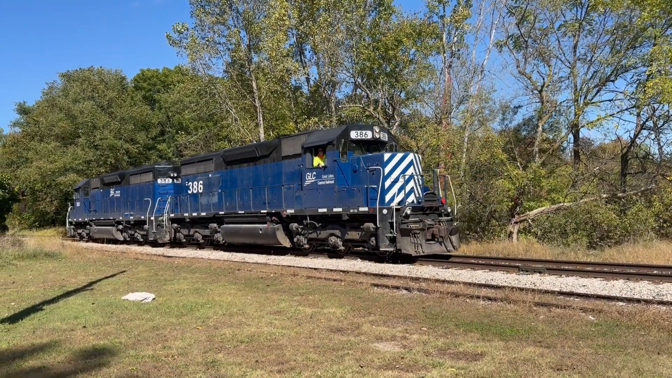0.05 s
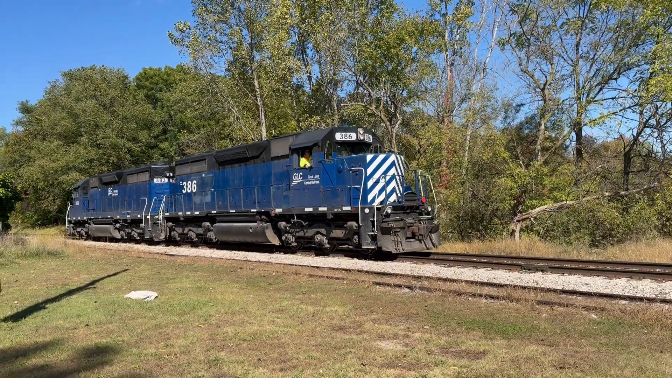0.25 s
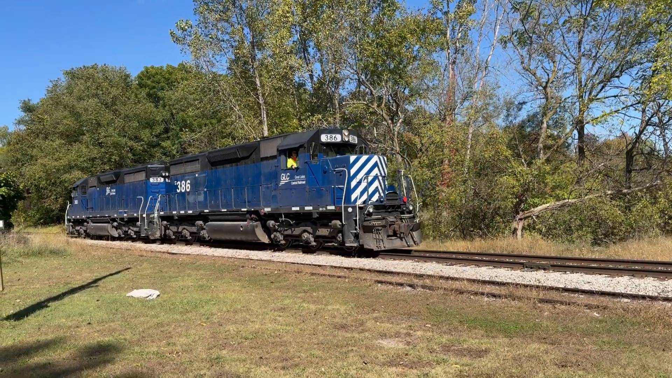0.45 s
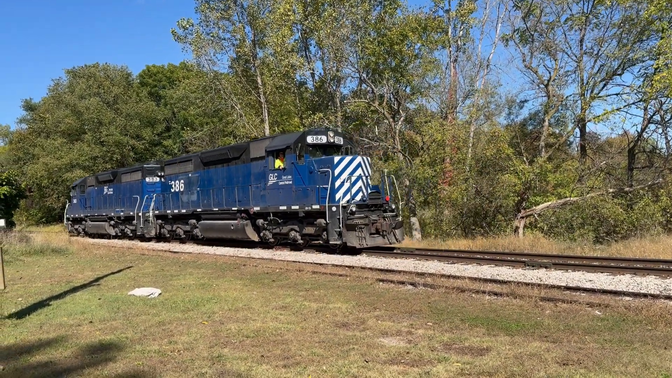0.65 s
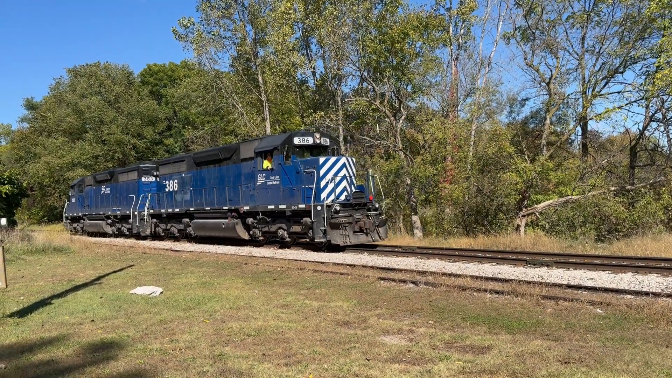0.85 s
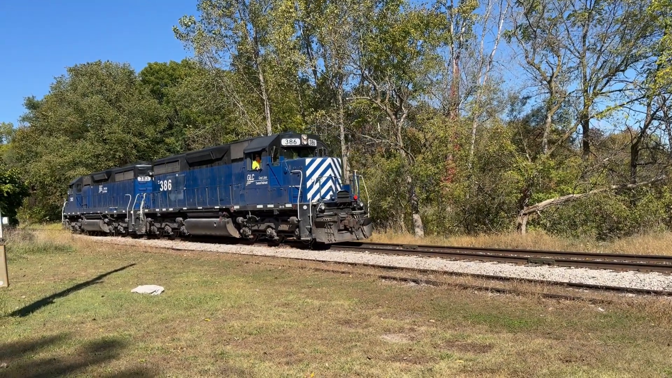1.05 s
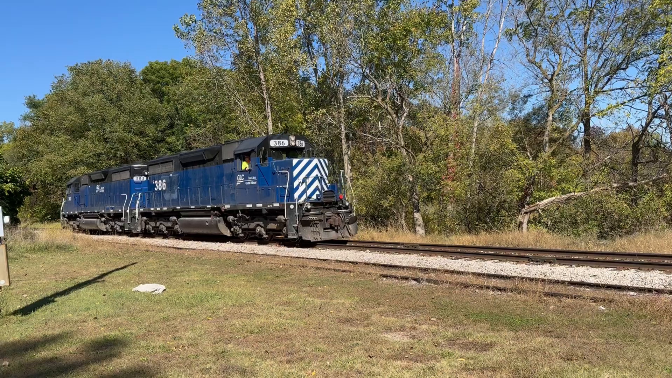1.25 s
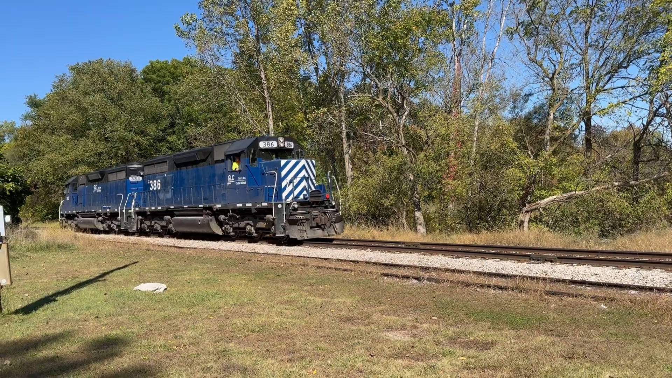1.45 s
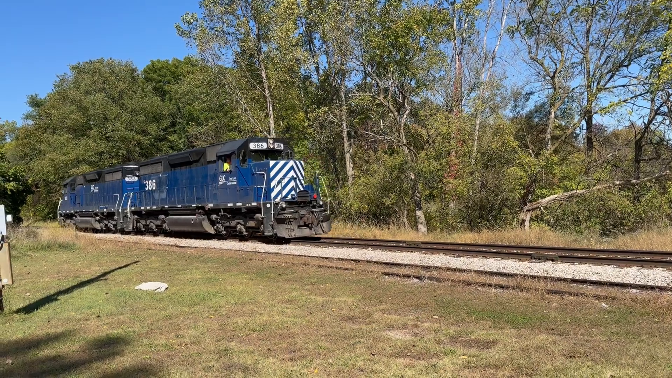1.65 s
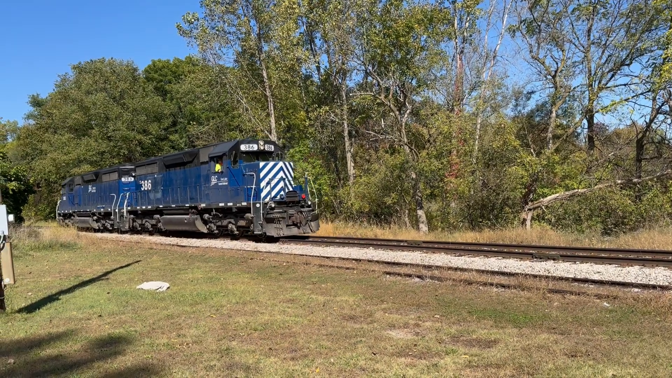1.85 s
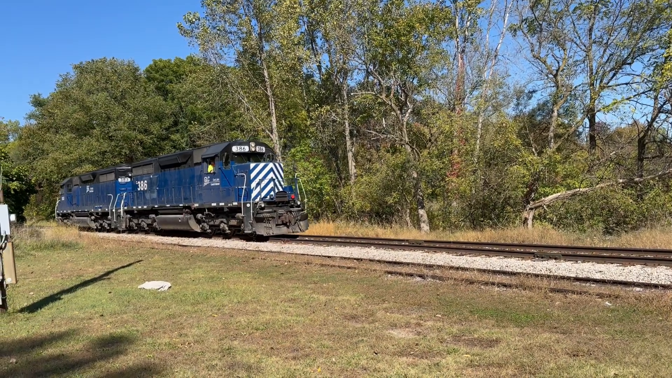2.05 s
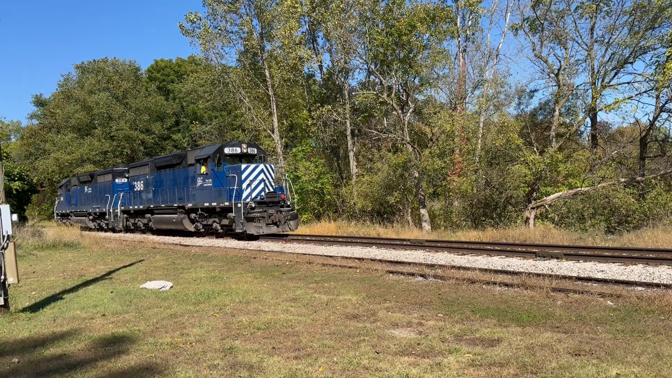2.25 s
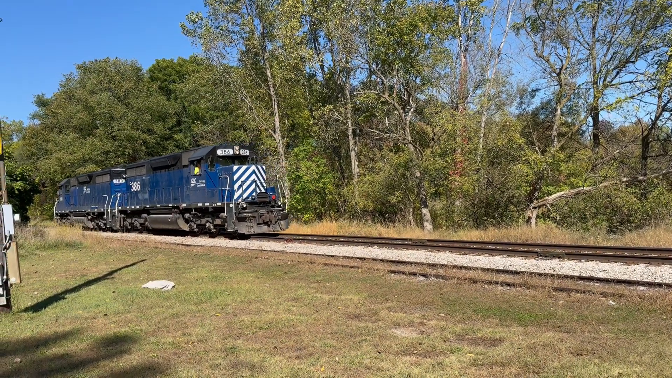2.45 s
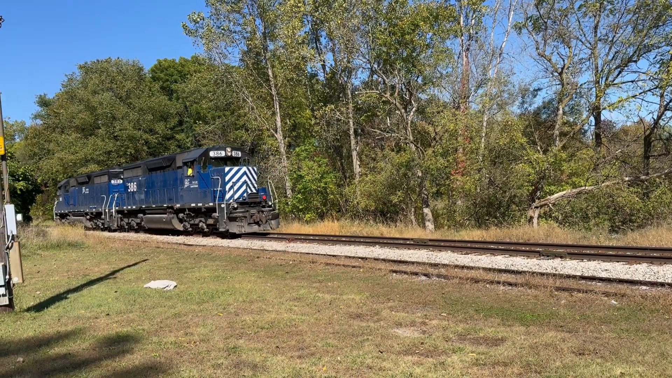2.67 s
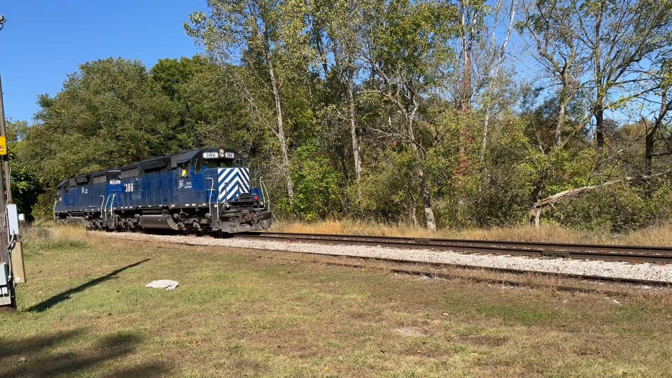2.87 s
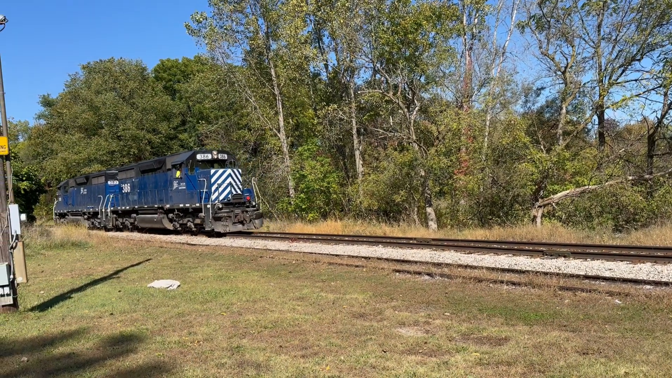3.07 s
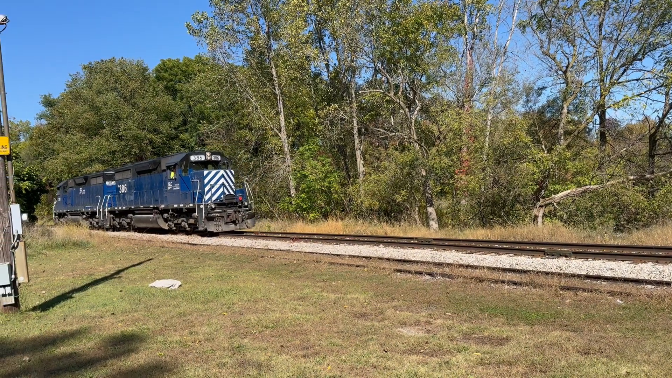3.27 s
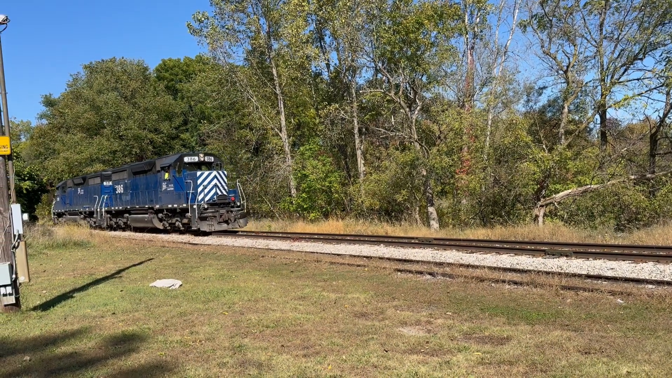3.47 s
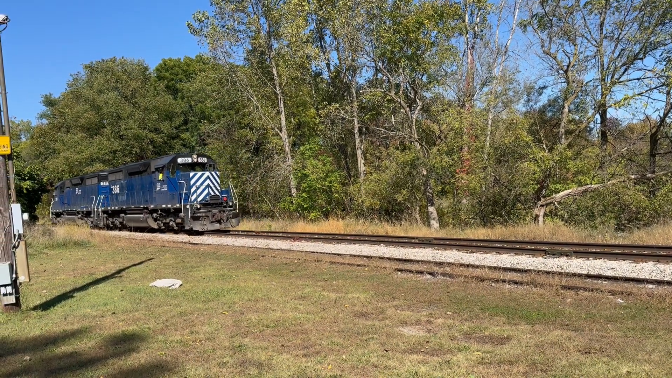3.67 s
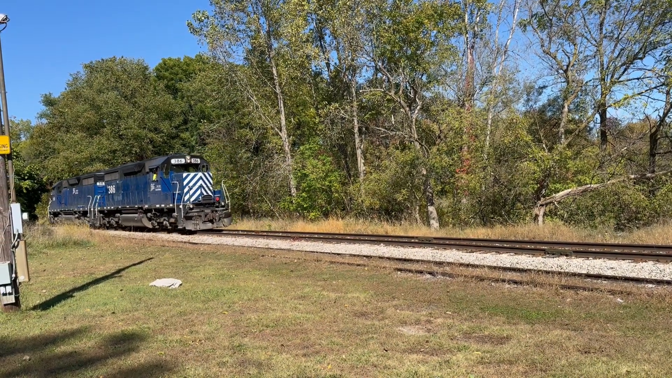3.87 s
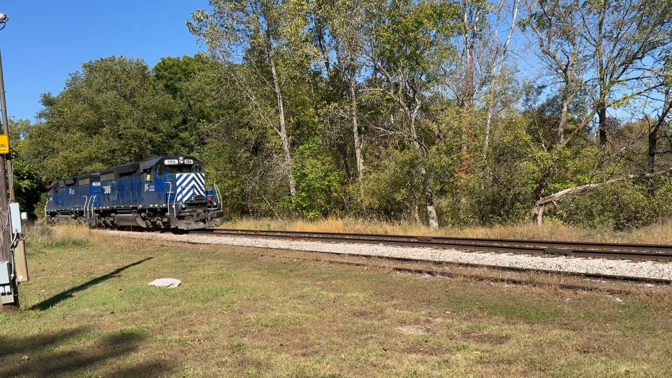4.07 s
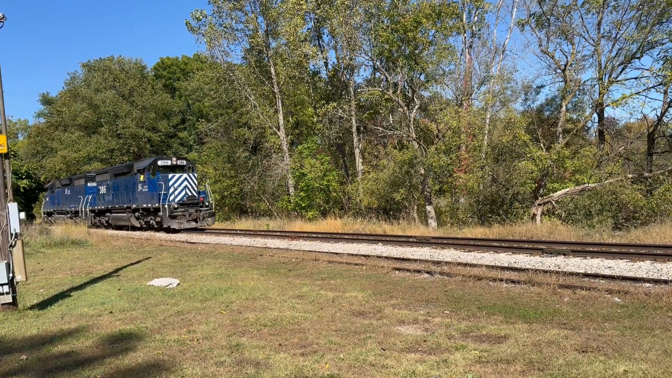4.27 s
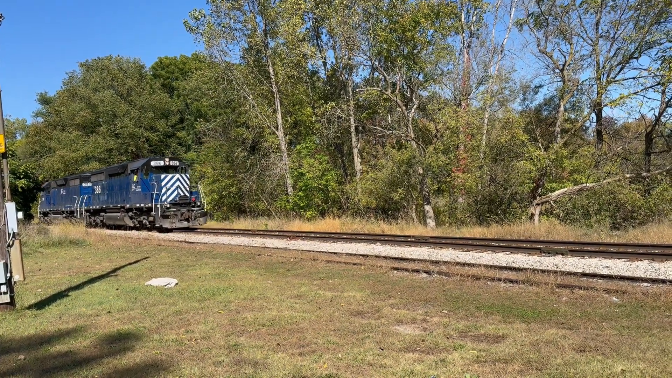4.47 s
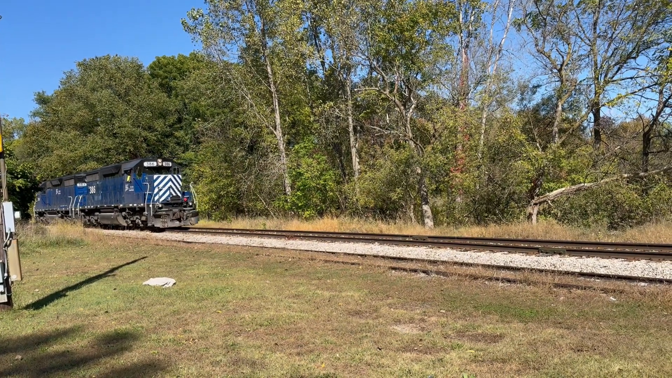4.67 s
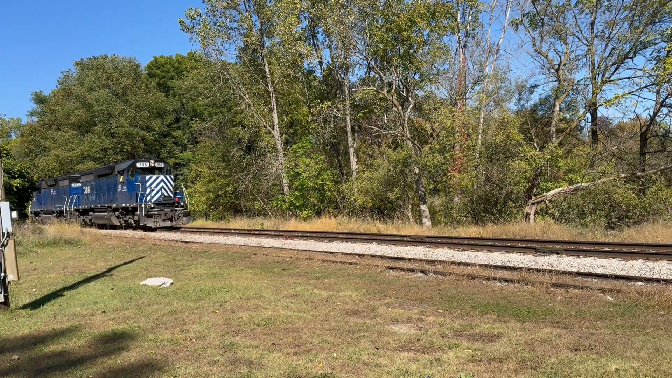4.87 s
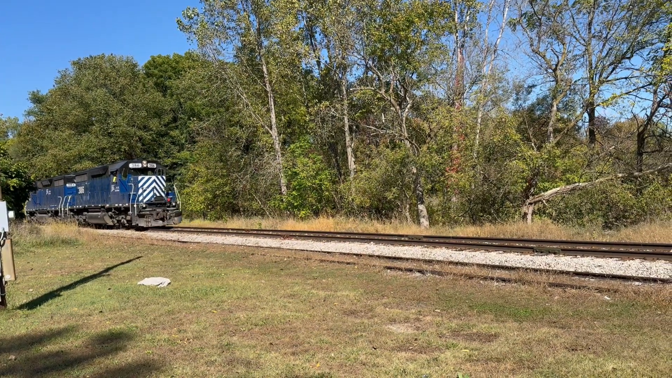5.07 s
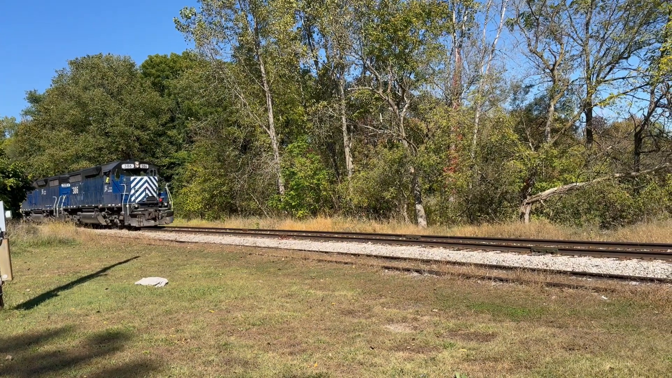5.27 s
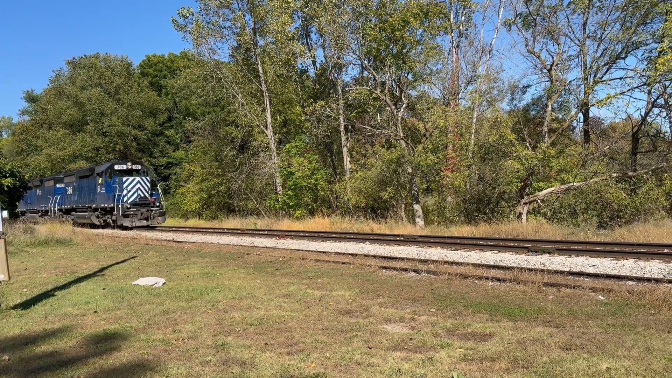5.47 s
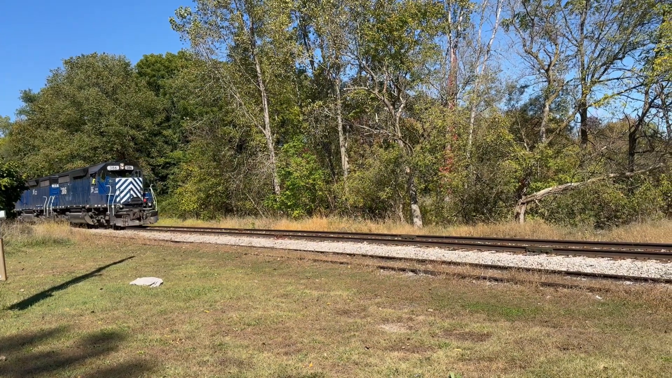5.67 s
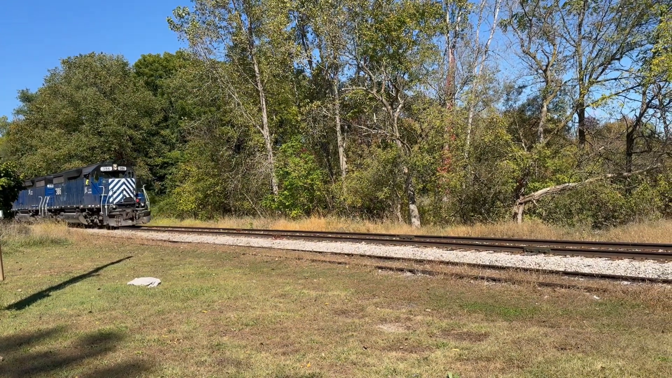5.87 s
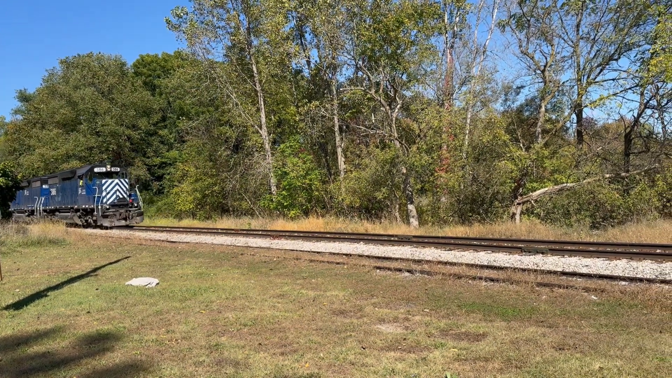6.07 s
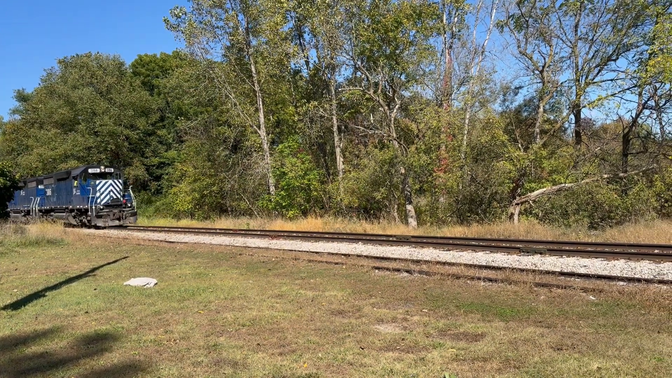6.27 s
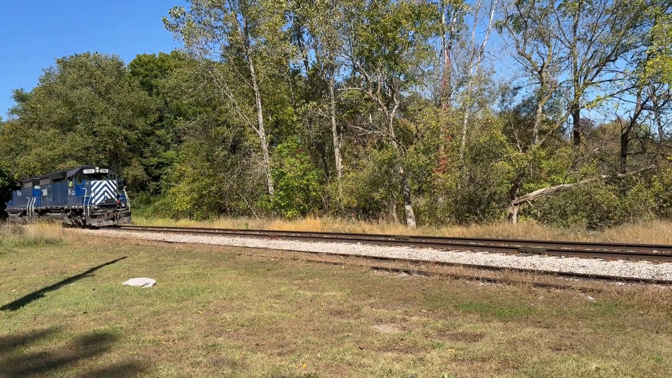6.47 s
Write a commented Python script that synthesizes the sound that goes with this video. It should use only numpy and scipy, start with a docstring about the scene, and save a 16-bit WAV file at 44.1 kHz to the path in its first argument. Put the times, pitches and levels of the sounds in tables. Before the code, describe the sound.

Outdoors beside a railway, two coupled diesel locomotives start loud and close, moving away leftward. From 0 to about 4 seconds the deep, pulsing exhaust drone glides down in pitch as the engines throttle back, the pair beating unevenly; a fuzzy turbo whine falls with it over broad low roar and soft hiss. A thin wheel squeal sounds during the first 0.75 seconds. Dull rail-joint thuds land near 1.05, 1.55 and 2.85, with scrapes and squeaks around 1.1 to 2.5. A sharp short scrape comes at 3.2, and the roar swells slightly around 3.7 to 4.2 with a faint squeal. From 4 seconds the engines idle steadily, quieter and more distant. A brief metallic chirp sounds at 4.75, a weak thud at 5.8, and scraping, squeaks and quick bright ticks near 6.2. The rumble continues to the cut at 6.5.

```python
"""Two coupled diesel locomotives roll away down a track while their engines throttle back to idle.
Their exhausts are sums of whole shaft orders that beat as one crankshaft gains on the other.
Turbocharger whine, roar and flange scrapes are noise shaped in short-time spectra; gear tones and
wheel squeals are wavering sines, joint thuds are damped tones with noise, and a loose part ticks."""
import sys
import numpy as np
from scipy import signal
from scipy.fft import rfft, irfft
from scipy.io import wavfile
from scipy.ndimage import uniform_filter1d

SR = 44100
rng = np.random.default_rng(int(sys.argv[2]) if len(sys.argv) > 2 else 0)


def output_pcm(signal):
    """Save a mono or channel-first signal as 16-bit PCM at the path in sys.argv[1].

    Samples are clipped to [-1, 1] before scaling.
    """
    pcm = np.clip(np.atleast_2d(signal).T, -1, 1) * 32767
    wavfile.write(sys.argv[1], SR, np.round(pcm).astype(np.int16))


def amplitude_ratio(level_db):
    """Convert a level in decibels to the matching linear amplitude (field) ratio."""
    exponent = np.asarray(level_db, float) / 20
    return 10 ** exponent


N = 287532  # samples
FRAME, HOP = 2048, 256  # samples, short-time spectra


def column(rows, t):
    """Linear interpolation: reads every column of a curve at the times t."""
    s, *values = np.transpose(rows)
    return [np.interp(t, s, v) for v in values]


def read(points, hz):
    """Interpolation on a log-frequency axis, as pitch is heard."""
    f, value = np.transpose(points)
    return np.interp(np.log(hz + 1), np.log(f + 1), value)


def evened(x):
    """Normalization of power: scales to rms 1."""
    return x / np.sqrt(np.mean(abs(x) ** 2) + 1e-20)


def wander(shape, size):
    """Low-passed randomness: noise averaged over size steps, at rms 1."""
    return evened(uniform_filter1d(rng.standard_normal(shape), size=size, axis=-1))


def grain(bins, frames, shape):
    """Correlated randomness: noise averaged over bins and frames, at rms 1."""
    across = uniform_filter1d(rng.standard_normal(shape), size=bins, axis=0)
    return evened(uniform_filter1d(across, size=frames, axis=1))


def add(mix, s, sound):
    """Superposition: mixes a sound in at s seconds."""
    part = mix[round(s * SR):][:len(sound)]
    part += sound[:len(part)]


# Speed of the near crankshaft. Each row: time in seconds, speed in turns per second.
CRANK_SPEED = [(0, 8.35), (.5, 7.98), (1, 7.46), (3, 5.67), (3.5, 5.33), (4, 5.1), (4.6, 5.05), (6, 5.17),
               (6.52, 5.15)]
# Angle by which the near crankshaft leads the far one, gaining fast under load and slowly at idle.
# Each row: time in seconds, lead in turns.
CRANK_LEAD = [(0, -.275), (.47, -.125), (2.27, .36), (3.4, .4375), (4.9, .562), (6.52, .625)]


def cranks(t):
    """Frequency as the rate of phase: near and far speeds in turns per second, and the lead in turns."""
    def smooth(v):
        return uniform_filter1d(v, size=len(t) // 25, mode="nearest")
    near = smooth(column(CRANK_SPEED, t)[0])
    lead = column(CRANK_LEAD, t)[0]
    gain = smooth(smooth(np.gradient(lead, t)))
    return near, near - gain, smooth(lead)


def load_of(speed):
    """Saturation: load is 0 at idle and levels off towards 1 as the crankshaft turns faster."""
    idle, span = 5.05, 1  # turns per second
    return 1 - np.exp(-np.maximum(speed - idle, 0) / span)


# Phase between the ports at full bearing. Each row: frequency in Hz, left lead in radians.
BEARING_PHASE = [(0, 0), (1030, 1), (2240, 6), (3190, 8.5), (3880, 12.5), (4220, 10.5), (4480, 16),
                 (5300, 10), (6980, 17.5)]
# Share of the treble phase in the stereo phase. Each row: frequency in Hz, share from 0 to 1.
TREBLE_SHARE = [(7000, 0), (7700, 1), (10500, 1)]
# Stereo phase of the treble, wide and nearly out of phase above 7 kHz.
# Each row: frequency in Hz, left lead in radians.
TREBLE_PHASE = [(8000, 2.8), (10000, 2.7), (13000, 1.4)]


def port_lead(hz, bearing):
    """Interaural phase: rotation of the right port, by bearing lower down, wide in the treble."""
    share = np.clip(read(TREBLE_SHARE, hz), 0, 1)
    by_bearing = bearing * np.interp(hz, *np.transpose(BEARING_PHASE))
    radians = (1 - share) * by_bearing + share * read(TREBLE_PHASE, hz)
    return np.exp(-1j * radians)


# Roar spectrum at full load, close by. Each row: frequency in Hz, relative density in dB.
LOADED_COLOUR = [(30, -71.5), (55, -42.5), (100, -39), (140, -44), (270, -45), (320, -50.5), (650, -51),
                 (800, -53.5), (1500, -61), (2500, -68), (4500, -70), (7200, -79.5), (8000, -82.5),
                 (11000, -85), (15500, -91.5)]
# Roar spectrum at idle, down the track. Each row: frequency in Hz, relative density in dB.
IDLE_COLOUR = [(30, -67.5), (55, -47.5), (100, -35), (140, -39), (270, -46.5), (320, -51.5), (630, -52),
               (1040, -59.5), (1440, -59.5), (1650, -67), (2870, -72.5), (3400, -75.5), (7200, -84.5),
               (8000, -87.5), (11000, -97.5), (13300, -100), (15500, -114)]
# Panels ringing in the roar. Each row: centre in Hz, width in Hz, lift in dB.
CASING_MODES = [(178.3, 21.5, 6), (269.2, 26, 6), (378.4, 24, 4), (464, 47, 4), (580, 170, 2.5),
                (960, 24, 4), (1484, 17, 0), (2250, 40, -0.5)]


def body_power(hz, load, roar_db, hiss_db):
    """Resonant filtering: spectrum of casing, fan and rolling noise, lifted by panel modes."""
    colour_db = load * read(LOADED_COLOUR, hz) + (1 - load) * read(IDLE_COLOUR, hz)
    for mode_hz, width, db in CASING_MODES:
        colour_db = colour_db + db * np.exp(-2 * ((hz - mode_hz) / width) ** 2)

    def band_db(lo, hi):
        inside = (hz > lo) * (hz < hi)
        return 10 * np.log10((amplitude_ratio(2 * colour_db) * inside).sum(0))
    low = 1 / (1 + (hz / 1500) ** 4)  # share that follows the roar rather than the hiss
    roar_gain_db = roar_db - band_db(lo=150, hi=1400)
    hiss_gain_db = hiss_db - band_db(lo=1600, hi=4000)
    return amplitude_ratio(2 * (colour_db + low * roar_gain_db + (1 - low) * hiss_gain_db))


# Flanges rubbing the rail, each a burst of hiss.
# Each row: start in seconds, length in seconds, strength in dB on the hiss, centre in Hz.
SCRAPES = [(1.108, 0.27, 7, 3200), (1.53, 0.06, 17, 2220), (1.842, .17, 4.5, 5970), (2.324, 0.16, 5, 5640),
           (2.552, 0.046, 0, 5560), (3.232, 0.023, 18.5, 3150), (3.536, .2, -3, 6100),
           (4.008, 0.064, 2.5, 6030), (4.261, 0.18, 2.5, 5200), (4.675, 0.4, -1.5, 5500),
           (5.992, 0.15, 2, 5700), (6.17, .1, 5.5, 6300)]


def rubbing(t):
    """Sliding contact: how firmly each flange rubs, 0 to 1, with 15 ms ramps."""
    return [np.clip(np.minimum(t - s, s + length - t) / .015, 0, 1) for s, length, _, _ in SCRAPES]


def scrape_power(hz, swells, hiss):
    """Friction noise: a band of hiss for each scrape, with thin treble above it."""
    air_db, air_hz = -22.5, 11000
    power = 0
    for swell, (_, _, db, centre_hz) in zip(swells, SCRAPES):
        rub = np.exp(-(np.log((hz + 1) / centre_hz) / 0.29) ** 2)
        air = np.exp(-(np.log((hz + 1) / air_hz) / .4) ** 2)
        power = power + hiss * swell * (amplitude_ratio(2 * db) * rub + amplitude_ratio(2 * (db + air_db)) * air)
    return power


# Turbocharger blades. Each row: shaft order, width in Hz at 4.86 turns per second,
# level in dB on the whine level.
BLADE_TONES = [(855.7, 90, -21), (1703, 210, -42.5)]
# Level of the whine. Each row: time in seconds, relative level in dB.
WHINE_CURVE = [(0, -35), (.8, -33.5), (1.5, -39), (2, -36), (3, -39.5), (4, -38), (4.5, -35.5), (5, -36.5),
               (5.5, -36), (6.52, -34.5)]


def turbocharger_power(hz, t, near, far, load):
    """Blade-passing tones: fuzzy peaks at multiples of shaft speed, one set per turbocharger."""
    overrun = load * 1.3 + (1 - load) * 0.94  # % by which the near one runs ahead of its shaft order
    level_db = column(WHINE_CURVE, t)[0]
    power = 0
    for speed in near * (1 + overrun / 100), far:
        for order, width, db in BLADE_TONES:
            surge_db = 1.24 * wander(len(t), 12)
            spread = width * (speed / 4.86) ** 1.2
            peak = np.exp(-2 * ((hz - order * speed) / spread) ** 2)
            power = power + amplitude_ratio(2 * (level_db + db + surge_db)) * peak
    return power


# Level of the roar, falling with distance and swelling once more.
# Each row: time in seconds, relative level in dB.
ROAR_LEVEL = [(0, -26.5), (.87, -29), (2.51, -32.5), (3.25, -35), (3.7, -32.5), (4.19, -32.5),
              (4.49, -34.5), (5.72, -36), (6.1, -35.5), (6.52, -37)]
# Likeness of the ports. Each row: frequency in Hz, coherence from 0 to 1.
COHERENCE = [(60, 0.96), (250, 1), (500, 0.94), (1000, 0.79), (2000, 0.46), (4000, 0.33), (7000, 0.25),
             (8000, 0.9)]
# Level difference of the ports. Each row: frequency in Hz, left minus right in dB.
PORT_TILT = [(60, 0.5), (150, -1), (400, 1), (1030, 0), (2640, 2), (6800, 2)]
# Bearing of the roar. Each row: time in seconds, bearing from 0 (ahead) to 1 (far to the left).
ROAR_BEARING = [(0, 0.18), (1.5, 0.36), (2.2, 0.98), (3.5, 0.9), (6.52, 0.89)]


def roar():
    """Random-phase synthesis: body, whines and scrapes as partly coherent noise at the two ports."""
    frames = N // HOP + 9
    t = np.arange(frames) * HOP / SR
    hz = np.fft.rfftfreq(FRAME, 1 / SR)[:, None]
    near, far, _ = cranks(t)
    load = load_of(near)
    swells = rubbing(t)
    roar_db = column(ROAR_LEVEL, t)[0]
    # the hiss follows the roar and rises while a flange rubs
    hiss_db = roar_db - 13.5 + 2.9 * uniform_filter1d(np.max(swells, axis=0), size=25)
    hiss = amplitude_ratio(2 * (hiss_db - 32.0))  # power per bin, the measure of scrapes
    power = body_power(hz, load, roar_db, hiss_db)
    power = power + turbocharger_power(hz, t, near, far, load)
    power = power + scrape_power(hz, swells, hiss)

    shape = (len(hz), frames)
    texture_db = 0.91 * grain(20, 12, shape)  # patches
    texture_db += 0.64 * grain(240, 3, shape)  # brief flicker over wide bands
    texture_db += 1.15 * grain(2, 40, shape)  # long narrow streaks
    a, b, c, d = rng.standard_normal((4, *shape))
    left, apart = a + 1j * b, c + 1j * d
    same = np.clip(read(COHERENCE, hz), 0, 1)
    right = same * left * port_lead(hz, column(ROAR_BEARING, t)[0]) + np.sqrt(1 - same ** 2) * apart
    half = amplitude_ratio(read(PORT_TILT, hz) / 2)
    spectra = np.array([left * half, right / half]) * np.sqrt(power) * amplitude_ratio(texture_db)
    return amplitude_ratio(5.0) * signal.istft(spectra, nperseg=FRAME, noverlap=FRAME - HOP)[1][:, :N]


# A loose part chatters. Each row: start in seconds, peak in dB.
LOOSE_TICKS = [(6.193, -53), (6.205, -55.5), (6.217, -49.5), (6.228, -50), (6.2494, -50.5)]


def chatter():
    """Impact excitation: short bright ticks near 8 kHz, alike at both ports."""
    t, out = np.arange(SR // 20) / SR, np.zeros(N)
    for s, db in LOOSE_TICKS:
        ring = np.sin(2 * np.pi * 8000 * rng.uniform(.94, 1.06) * t)
        add(out, s, amplitude_ratio(db - 60 * t / .02) * ring)  # falls 60 dB in 20 ms
    return out


# Wheels over rail joints. Each row: start in seconds, level in dB before the ring and noise gains,
# ring in Hz.
JOINT_THUDS = [(1.056, -29, 276), (1.551, -26, 411), (2.84, -28.5, 226.5), (5.78, -36, 401)]


def thuds():
    """Damped resonance: each joint starts a ring and a low rumble that die away together."""
    t, out = np.arange(SR // 5) / SR, np.zeros(N)
    lowpass = signal.butter(N=3, Wn=900, fs=SR)
    for s, db, hz in JOINT_THUDS:
        rumble = signal.lfilter(*lowpass, rng.standard_normal(len(t)))
        knock = 1.63 * np.sin(2 * np.pi * hz * t) + 2.8 * rumble
        add(out, s, amplitude_ratio(db - 60 * t / 0.24) * knock * np.minimum(t / 0.0039, 1))
    return out


# Wheels singing briefly, after a steady thin tone near 2250 Hz at the start. Each row: start in seconds, length
# in seconds, frequency in Hz, # rms level in dB before fades and flutter.
WHEEL_SQUEALS = [(0, .75, 2250, -53), (1.101, .35, 2480, -56.5), (1.122, 0.17, 5450, -54),
                 (1.097, 0.13, 2710, -52), (1.878, .13, 7370, -61), (2.33, 0.14, 6630, -58),
                 (3.591, 0.4, 960, -47.5), (3.7, .65, 2454, -56.5), (4.258, .2, 7240, -63),
                 (4.75, .09, 1122, -41.5), (4.852, 0.074, 1120, -46), (4.781, 0.23, 2245, -57.5),
                 (4.9, 0.043, 5520, -52), (6.19, .035, 3890, -50.5), (6.23, 0.037, 3850, -51.5)]


def squeals():
    """Frequency and amplitude modulation: thin tones, mostly wheel squeals, that waver in pitch and level."""
    out = np.zeros(N)
    for s, length, hz, db in WHEEL_SQUEALS:
        n = round(length * SR)
        drift, flutter = wander((2, n), 700)
        tone = np.sin(2 * np.pi * np.cumsum(hz + 8 * drift) / SR)
        level = np.sqrt(2) * amplitude_ratio(db + 2.8 * flutter)
        add(out, s, level * tone * signal.windows.tukey(n, .4))
    return out


# Gear mesh tones of the far engine. Each row: shaft order, rms under load in dB, rms at idle in dB,
# both before flutter.
GEAR_MESH = [(288, -57.5, -51), (561, -56.5, -62)]


def gears():
    """Tooth-meshing frequency: thin tones follow the crankshaft, fluttering in pitch and level."""
    t, out = np.arange(N) / SR, np.zeros(N)
    near, speed, _ = cranks(t)
    load = load_of(near)
    for order, loaded_db, idle_db in GEAR_MESH:
        drift, flutter = wander((2, N), 1500)
        tone = np.sin(2 * np.pi * np.cumsum(order * speed * (1 + .006 * drift)) / SR)
        level_db = load * loaded_db + (1 - load) * idle_db + 3.9 * flutter
        out += np.sqrt(2) * amplitude_ratio(level_db) * tone
    return out


# Exhaust note of either engine. Each row: shaft order (rounded when played), level under load in dB,
# level at idle in dB, both before distance, stack and waver.
EXHAUST_ORDERS = [(5.83, -36, -52.5), (7.02, -32, -50), (8.02, -12, -34.5), (9.05, -18.5, -34.5),
                  (10.33, -27, -33.5), (10.95, -32, -32), (12.12, -42, -26.5), (13.02, -32, -32.5),
                  (14.1, -36, -32.5), (15.1, -37.5, -18.5), (15.85, -38.5, -24), (16.91, -40.5, -20),
                  (18, -55, -42.5), (18.95, -47.5, -34), (19.71, -41, -45.5), (21.04, -50.5, -44),
                  (23.01, -43, -52.5), (24.52, -47, -44.5)]


def exhausts():
    """Beating: both engines sound the same orders; order k beats k times per turn one shaft gains."""
    start_m, train_m_per_s = 29.8, 6.1
    stack_hz, stack_width_hz, stack_peak_db = 95.1, 5.45, 8  # resonance the orders sweep through
    step = 32  # samples; computed at a reduced rate
    t = np.arange(0, N + 640, step) / SR
    near, _, lead = cranks(t)
    load = load_of(near)
    level_db = 0.7 - 20 * np.log10(1 + train_m_per_s * t / start_m)  # falls as 1 / distance
    far_db = load * -8 + (1 - load) * -2  # far engine against the near one
    turns = np.cumsum(near) * t[1] + .017  # crank angle, with its start
    out = np.zeros(len(t))
    for order, loaded_db, idle_db in EXHAUST_ORDERS:
        k = round(order)  # only whole orders: the pattern repeats every turn
        lag = -.129 * k * k  # turns; the manifold shifts its orders unequally
        waver_db = 0.89 * wander((2, len(t)), 600)
        stack_db = stack_peak_db * load ** 2 / (1 + ((k * near - stack_hz) / stack_width_hz) ** 2)
        pair = amplitude_ratio(waver_db[0]) * np.cos(2 * np.pi * (k * turns - lag))
        pair += amplitude_ratio(waver_db[1] + far_db) * np.cos(2 * np.pi * (k * (turns - lead) - lag))
        order_db = level_db + stack_db + load * loaded_db + (1 - load) * idle_db
        out += np.sqrt(2) * amplitude_ratio(order_db) * pair
    return signal.resample_poly(out, up=step, down=1)[:N]


def ports(x):
    """Phase delay: a point source on the left, so the right port hears it later."""
    wide = np.pad(x, FRAME, mode="reflect", reflect_type="odd")
    wide = wide * signal.windows.tukey(len(wide), 2 * FRAME / len(wide))
    turned = rfft(wide) * port_lead(np.fft.rfftfreq(len(wide), 1 / SR), 0.92)
    late = irfft(turned, len(wide))
    return np.array([x, late[FRAME:-FRAME]])


def scene():
    """Superposition of the roar, the engines, the wheels and the loose part."""
    wheels = thuds() + squeals()
    return roar() + chatter() + ports(wheels + gears() + exhausts())


def roll_off(x):
    """The treble ends steeply here."""
    return signal.sosfilt(signal.butter(12, 15760, fs=SR, output="sos"), x)


def record(dry):
    """High-pass filtering: the microphone drops the deepest bass."""
    cut = signal.butter(N=6, Wn=38, btype="highpass", fs=SR, output="sos")
    mix = signal.sosfilt(cut, dry)
    return roll_off(mix)


dry = scene()
out = record(dry)
output_pcm(out)
```